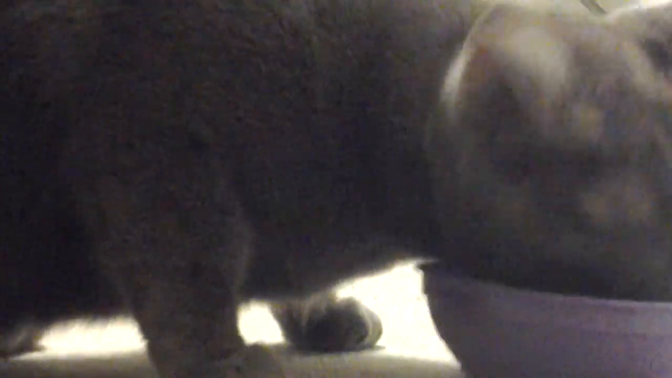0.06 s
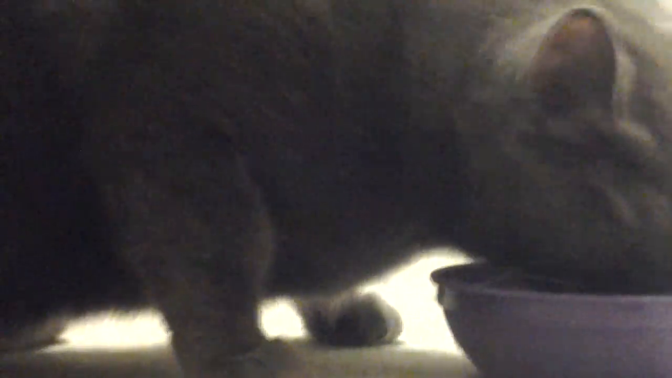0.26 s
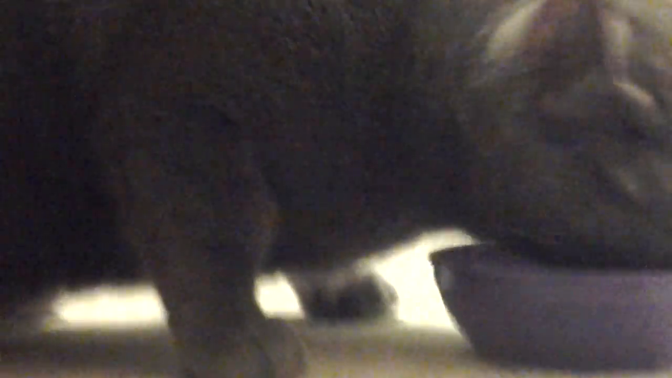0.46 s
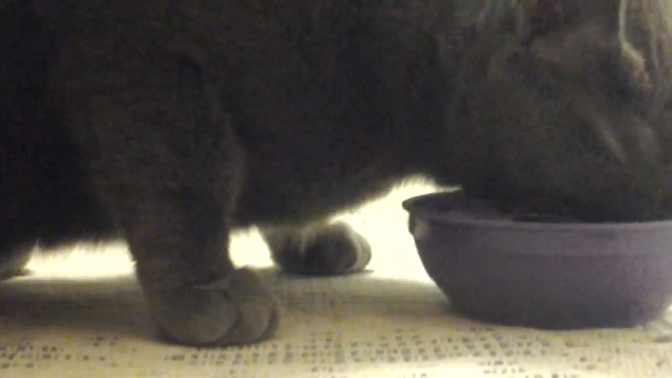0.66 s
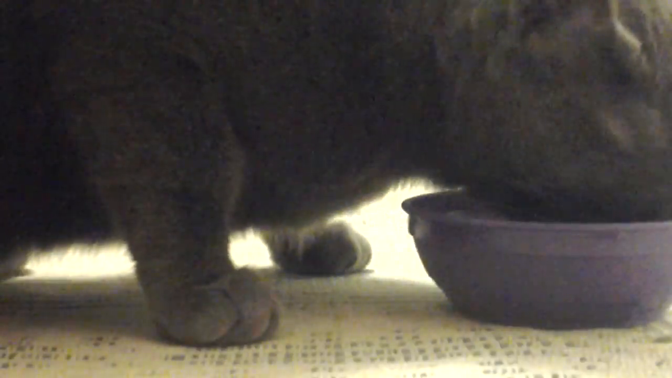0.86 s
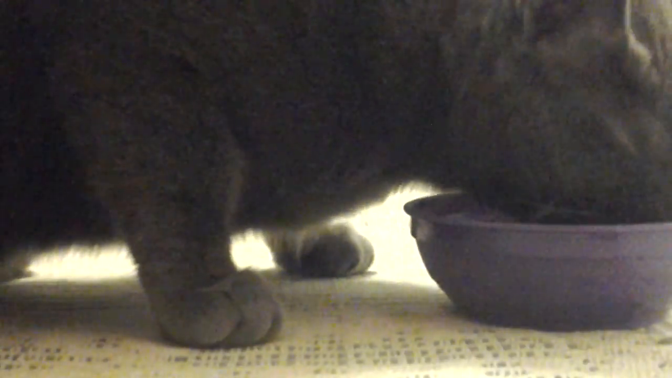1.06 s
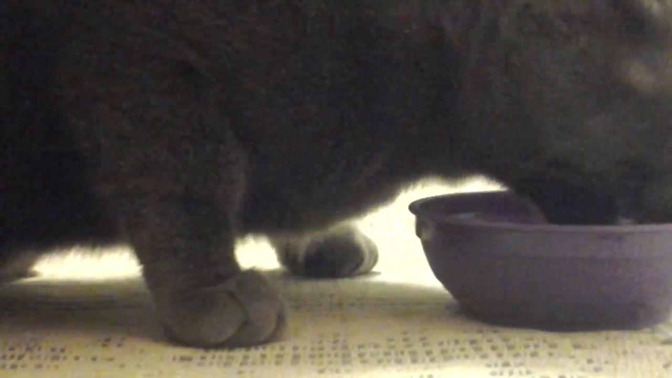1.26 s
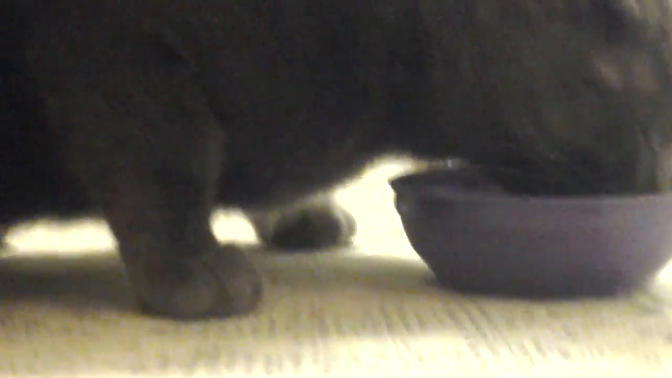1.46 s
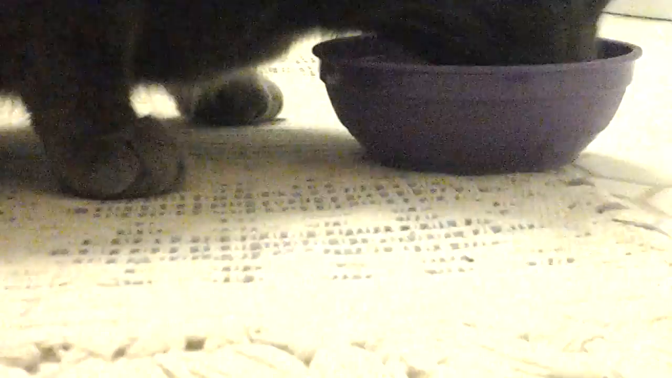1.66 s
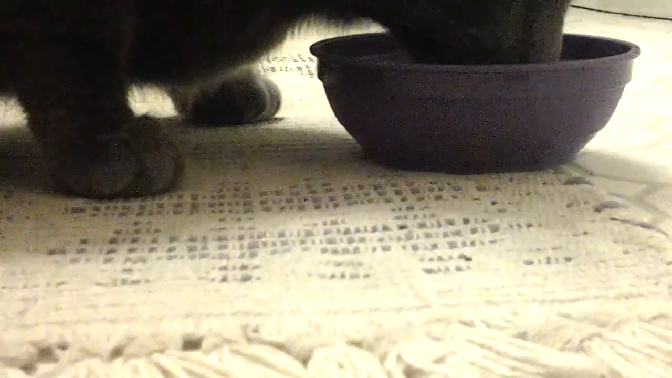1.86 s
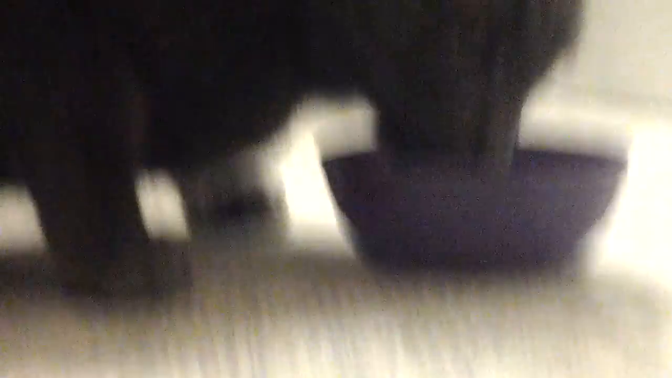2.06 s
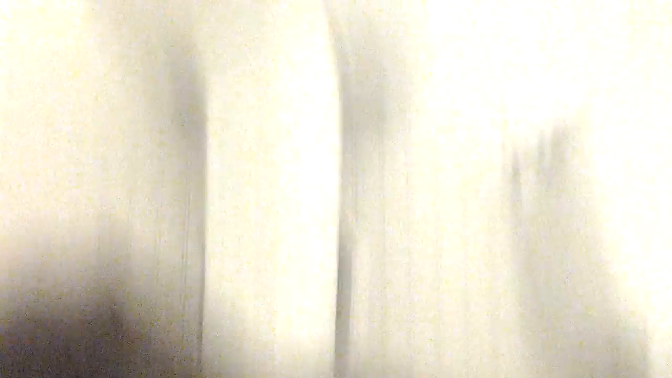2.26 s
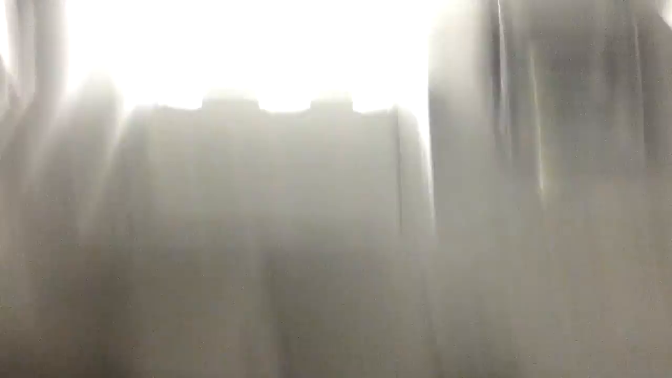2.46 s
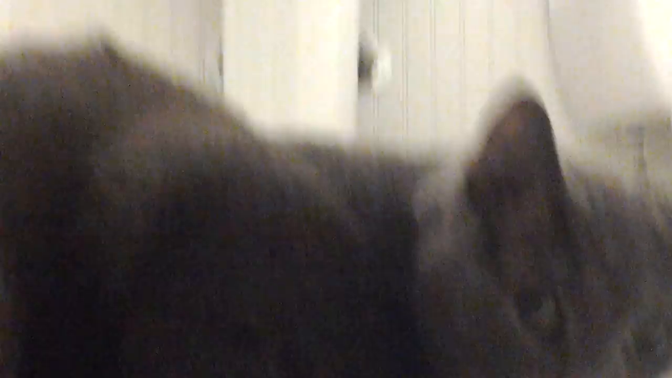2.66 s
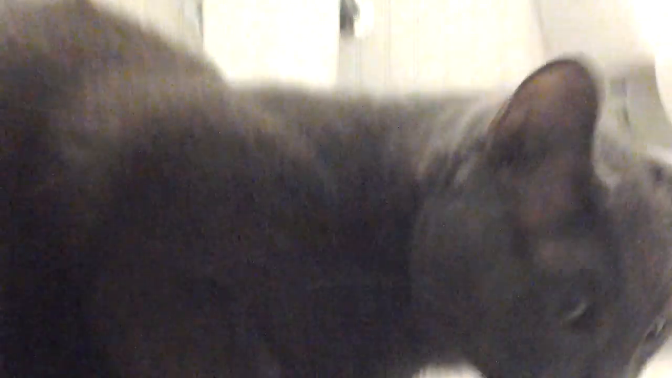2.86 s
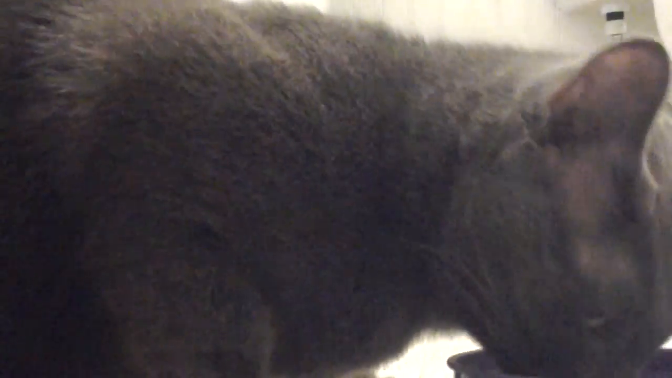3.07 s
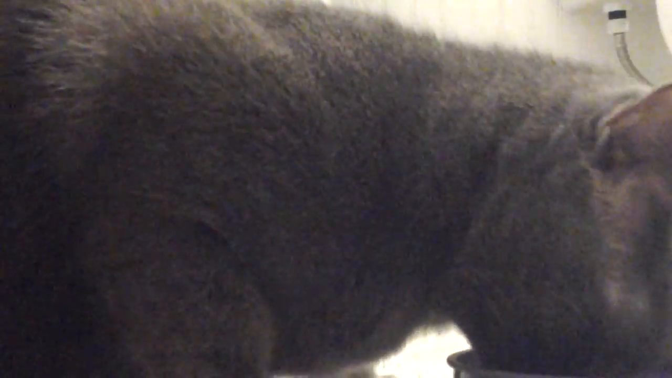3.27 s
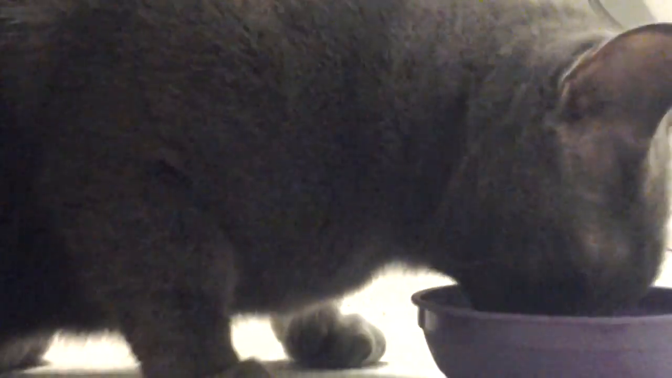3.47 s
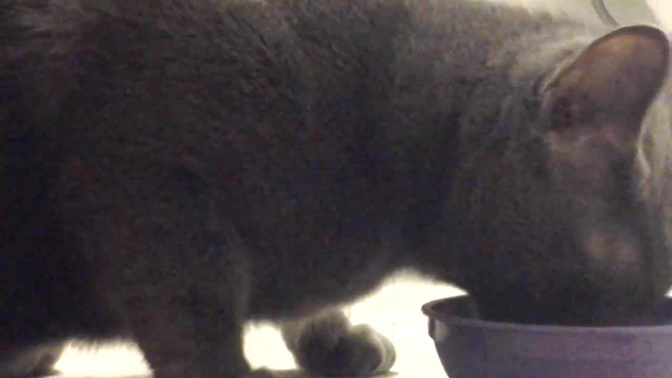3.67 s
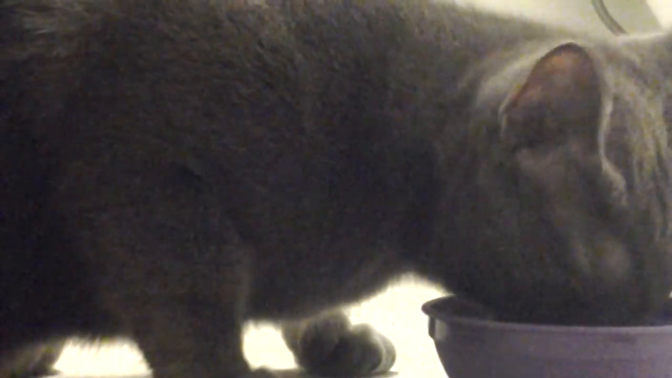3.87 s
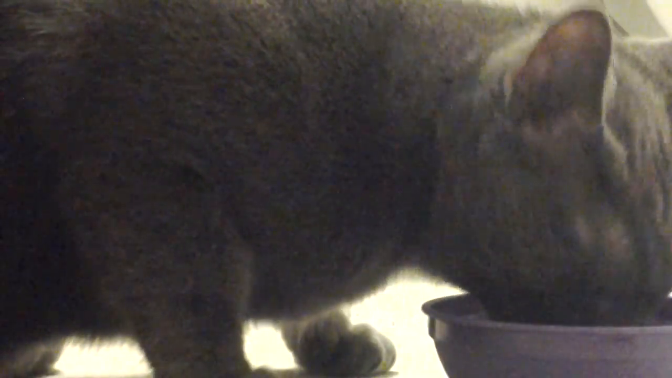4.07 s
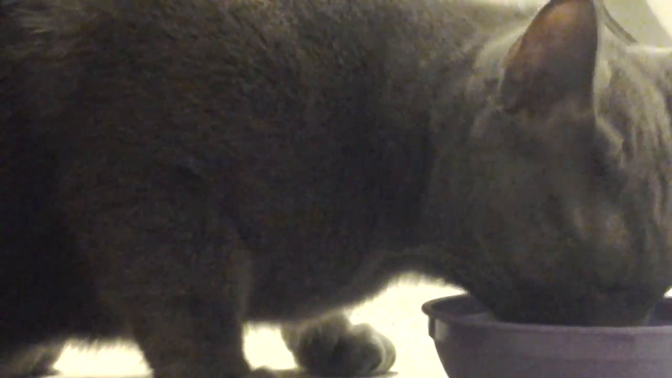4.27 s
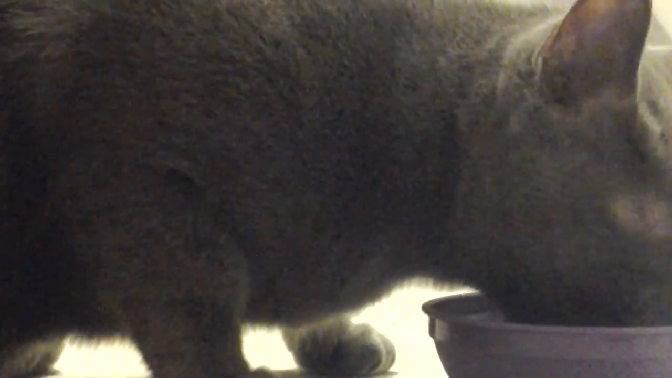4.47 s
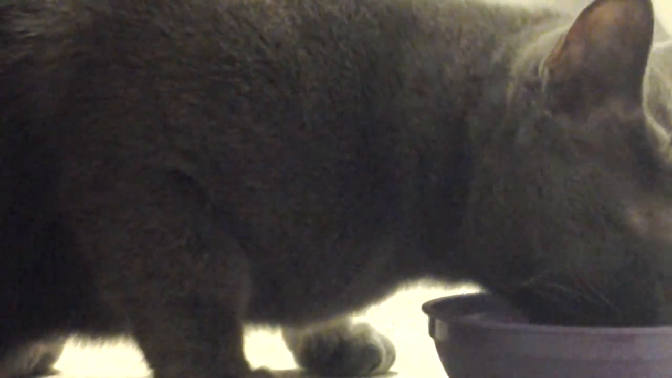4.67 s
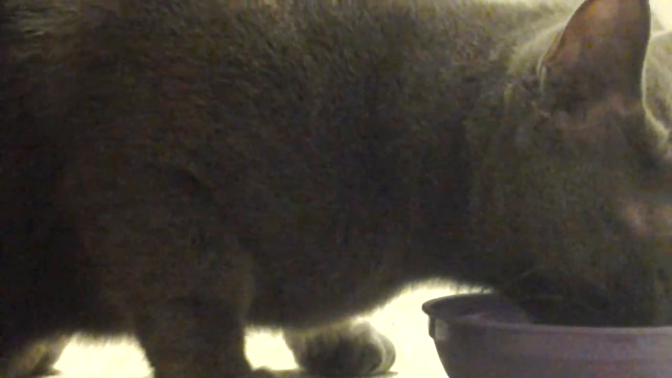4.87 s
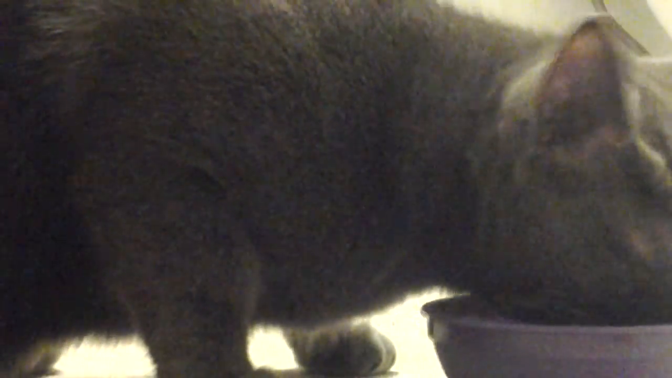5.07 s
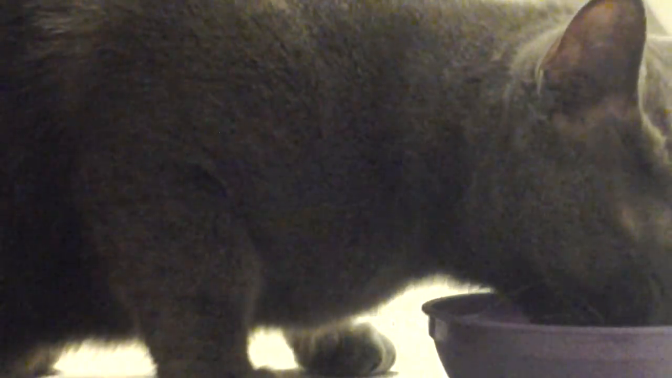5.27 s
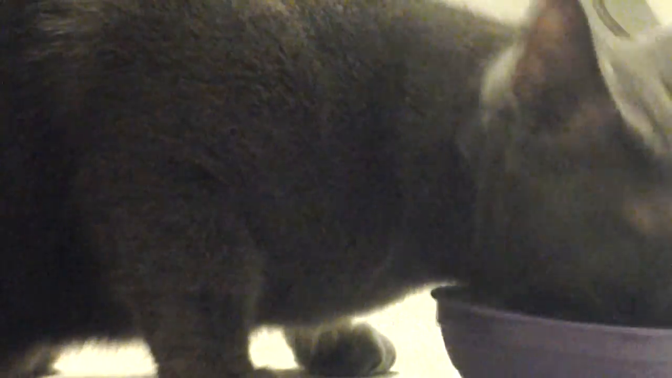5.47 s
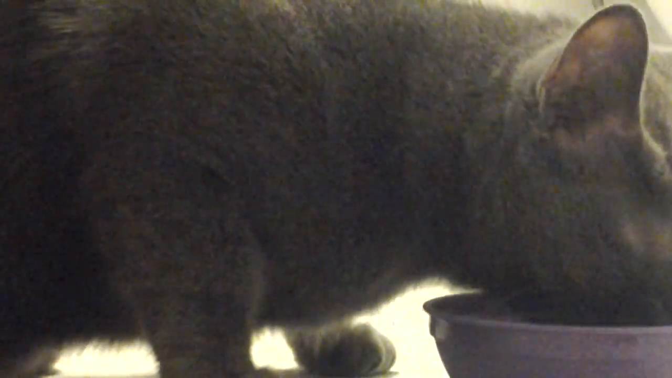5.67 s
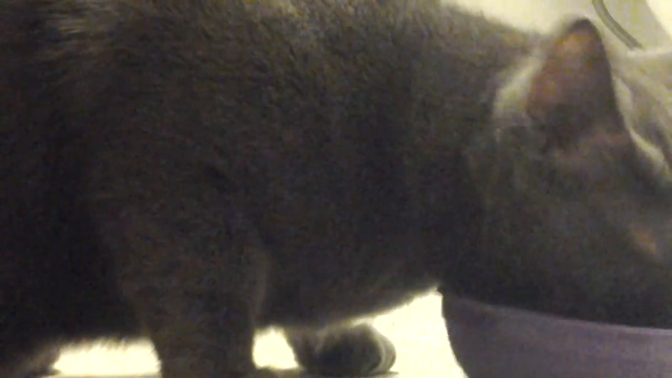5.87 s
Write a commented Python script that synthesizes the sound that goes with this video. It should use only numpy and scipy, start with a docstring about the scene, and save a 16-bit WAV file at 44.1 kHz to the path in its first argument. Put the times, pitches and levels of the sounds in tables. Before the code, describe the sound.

Close, thin-sounding capture of a cat eating dry food. Early crunches mix with dull hand knocks and a dragging mat scrape; midway, hollow finger rubbing leads to hard clipped thumps that ring in the lively room. Then crisp, uneven bites dominate, fading to scattered snaps with a faint low tone near the end.

```python
"""A cat crunches dry food from a plastic bowl in a small, hard-walled room, close to a hand-held camera.
First second: kibble snaps and rattles, the case ticks, the hand knocks; the camera drags on the mat to 1.3 s.
From 1.6 s fingers rub the case; near 2.5 and 2.65 s hard bumps overload the microphone.
From 3.6 s dense crunching, sparser after 4.7 s; a faint tone rises near 5.6 s. Impacts are filtered
clicks with micro-slips; friction is filtered noise or random grains under movement envelopes."""
import sys
import numpy as np
from scipy import signal
from scipy.fft import rfft, irfft
from scipy.io import wavfile
from scipy.ndimage import uniform_filter1d

SR = 44100
rng = np.random.default_rng(int(sys.argv[2]) if len(sys.argv) > 2 else 0)


def file_out(sig):
    """Save sig as 16-bit WAV at sys.argv[1]."""
    # one column per channel
    cols = np.atleast_2d(sig).T
    # limit, then scale
    lim = np.clip(cols, -1, 1)
    pcm = np.round(lim * 32767).astype(np.int16)
    wavfile.write(sys.argv[1], SR, pcm)


N = 260631
TIME = np.arange(N) / SR
BINS = np.fft.rfftfreq(2048, 1 / SR)  # filter grid [Hz]


def amp(db):
    """Decibels to gain."""
    return 10 ** (np.asarray(db) / 20)


def unit(x):
    """Scales to rms 1."""
    return x / np.sqrt(np.mean(x ** 2) + 1e-20)


def read(points, hz):
    """Reads a spectrum on a log-frequency axis."""
    point_hz, value = np.transpose(points)
    return np.interp(np.log(hz + 1), np.log(point_hz + 1), value)


def add(mix, start_s, sound):
    """Mixes a sound in at start_s."""
    part = mix[max(round(start_s * SR), 0):][:len(sound)]
    part += sound[:len(part)]


def colour(x, gain_db):
    """Minimum-phase filter with gain_db on BINS: it rings only after a click."""
    cepstrum = irfft(np.log(amp(np.maximum(gain_db, -100))))
    half = len(cepstrum) // 2
    # fold to the causal side
    cepstrum[1:half] *= 2
    cepstrum[half + 1:] = 0
    impulse_response = irfft(np.exp(rfft(cepstrum)))
    return signal.oaconvolve(x, impulse_response)[:len(x)]


def roll_off(corner_hz, order):
    """Low-pass slope in dB: a softer contact has a lower corner."""
    return -10 * np.log10(1 + (BINS / corner_hz) ** (2 * order))


def thud(hz, damping, crack_hz):
    """Spectrum in dB of one damped resonance of a plastic shell, softened above crack_hz."""
    ratio = (BINS + 1) / hz
    resonance_db = -10 * np.log10(1 + ((ratio - 1 / ratio) / damping) ** 2)
    return resonance_db + roll_off(crack_hz, order=1)


def disperse(x, lag_s, corner_hz=260):
    """Bending waves: the treble arrives first and the bass up to lag_s later, so a blow sweeps downward."""
    hz = np.fft.rfftfreq(len(x), 1 / SR)
    phase = -2 * np.pi * lag_s * corner_hz * np.log1p(hz / corner_hz)
    return irfft(rfft(x) * np.exp(1j * phase), len(x))


def blow(level_db, spectrum_db, rattle=0, decay_s=1, lag_s=0):
    """One impact and a swell of micro-slips, coloured by what is struck; level_db is its loudest millisecond."""
    t = TIME[:len(BINS) * 2]
    slips = rng.standard_normal(len(t)) * np.sqrt(t) * np.exp(-t / decay_s)
    force = (t == 0) + rattle * slips / np.linalg.norm(slips)
    sound = disperse(colour(force, spectrum_db), lag_s)
    loudest_power = uniform_filter1d(sound ** 2, size=44, mode="constant").max()
    return amp(level_db) * sound / np.sqrt(loudest_power)


def grains(per_s, spread_db, size=N):
    """Random tiny impacts, most small and a few large."""
    strength = amp(spread_db * np.minimum(rng.exponential(1, size), 3.5))
    present = rng.random(size) < per_s / SR
    return strength * rng.choice([-1, 1], size) * present


def lumps(length_s, depth_db):
    """Uneven gain of rms 1 that swells and sinks at random, each lump about length_s long."""
    size = round(length_s * SR)
    smooth = uniform_filter1d(uniform_filter1d(rng.standard_normal(N), size), size)
    return unit(amp(depth_db * unit(smooth)))


def stroke(peak_s, rise_s, fall_s):
    """Gain of one movement: it grows exponentially to 1 at peak_s, then dies away."""
    return np.exp(-np.maximum((peak_s - TIME) / rise_s, (TIME - peak_s) / fall_s).clip(0, 50))


# room decay: (frequency [Hz], t60 [s])
ROOM_DECAY = [(200, 1), (600, 0.57), (1600, 0.42), (4500, 0.5), (8000, 0.32), (14000, 0.12)]


def room(x):
    """Dense wall reflections, each band dying at its own speed."""
    hz, t, bands = signal.stft(rng.standard_normal(SR), SR, nperseg=256)
    bands = bands * amp(-60 * t / read(ROOM_DECAY, hz)[:, None])
    fade_in = np.clip((TIME[:SR] - .002) / 0.0012, 0, 1)
    tail = signal.istft(bands, SR)[1][:SR] * fade_in
    tail /= np.sqrt(np.mean(abs(rfft(tail)[1000:4000]) ** 2))  # unit mean power gain, 1-4 kHz
    return signal.fftconvolve(x, tail)[:N]


def shifting_room(x, turns_per_s=2.9, count=3):
    """The room as heard from a moving head: a few different tails take turns."""
    shares = [np.maximum(np.cos(2 * np.pi * (turns_per_s * TIME - k / count)), 0) for k in range(count)]
    total = np.linalg.norm(shares, axis=0)
    return sum(room(x * share / total) for share in shares)


# room noise spectrum: (frequency [Hz], relative gain [dB])
NOISE_SPECTRUM = [(110, 1), (280, 3), (900, -2), (1450, -8), (4000, -10), (6500, -12.5), (14500, -16.5)]
# faint low tone: (time [s], level [dB])
TONE_LEVEL = [(5.56, -66), (5.59, -50.5), (5.91, -53)]
NOISE_DB, TONE_HZ = -56.5, 592


def background(width_hz=48):
    """Quiet coloured noise with drifting level; narrow-band noise makes a fluttering faint tone."""
    drift, flutter = lumps(length_s=.08, depth_db=1), lumps(length_s=.02, depth_db=3)
    noise = drift * unit(colour(rng.standard_normal(N), read(NOISE_SPECTRUM, BINS)))
    hz = np.fft.rfftfreq(N, 1 / SR)
    resonance = 1 / (1 + ((hz - TONE_HZ) / width_hz) ** 2)
    tone = flutter * irfft(rfft(rng.standard_normal(N)) * resonance, N)
    tone_db = np.interp(TIME, *np.transpose(TONE_LEVEL))
    return amp(NOISE_DB) * noise + amp(tone_db) * unit(tone)


# woven mat spectrum: (frequency [Hz], relative gain [dB])
MAT_SPECTRUM = [(60, -2), (300, 8), (600, 7), (1200, 1), (3600, -15.5), (8000, -35.5)]
# shoves of the camera over the mat: (time of top speed [s], level [dB], speed-up [s])
MAT_SHOVES = [(0.539, -34.5, 0.029), (0.985, -43, 0.0074), (1.039, -40.5, 0.03), (1.229, -24.5, 0.075)]
MAT_STOP_S = 0.023


def dragging(drag_db=0, room_db=-13):
    """The weave of the mat catches and lets go, in dense clumps of strands."""
    catches = grains(per_s=1800, spread_db=2.5) * lumps(length_s=.004, depth_db=3)
    strands = disperse(colour(catches, read(MAT_SPECTRUM, BINS)), lag_s=0.00388)
    speed = sum(amp(db) * stroke(s, rise_s, MAT_STOP_S) for s, db, rise_s in MAT_SHOVES)
    dry = amp(drag_db) * speed * unit(strands)
    return dry + amp(room_db) * room(dry)


# hollow rumble of the rubbed case: (frequency [Hz], relative gain [dB])
RUMBLE_SPECTRUM = [(60, -12.5), (200, -9), (310, -8.5), (410, 2.5), (580, -14), (900, -12), (2300, -23),
                   (5000, -29), (9000, -37.5)]
# fine hiss of skin: (frequency [Hz], relative gain [dB])
HISS_SPECTRUM = [(500, -3), (5000, 14), (10500, 3), (13500, 8.5), (15000, 0.5)]
# fingers on the case: (time of top speed [s], speed-up [s], slow-down [s], rumble level [dB], hiss level [dB])
FINGER_SLIDES = [(1.603, 0.054, 0.061, -33, -48.5), (2.17, 0.065, 0.28, -49, -52.5),
                 (2.278, 0.016, 0.039, -29, -38), (2.425, 0.03, 0.025, -35, -40),
                 (2.506, 0.012, 0.019, -15, -41.5), (2.607, 0.022, 0.036, -21, -38.5),
                 (3.425, 0.03, 0.033, -40, -50)]


def rubbing(body_db=0, hiss_db=0):
    """Skin sticks and slips on the case in jerks: each slide makes a hollow rumble and a fine hiss."""
    jerks = lumps(length_s=.004, depth_db=4.5)
    slips, grit = grains(per_s=2500, spread_db=3), grains(per_s=6000, spread_db=4.5)
    body = amp(body_db) * unit(colour(jerks * slips, read(RUMBLE_SPECTRUM, BINS)))
    hiss = amp(hiss_db) * unit(colour(jerks * grit, read(HISS_SPECTRUM, BINS)))
    return sum(stroke(s, rise_s, fall_s) * (amp(rumble_db) * body + amp(slide_hiss_db) * hiss)
               for s, rise_s, fall_s, rumble_db, slide_hiss_db in FINGER_SLIDES)


# dull knocks of the hand on the camera: (time [s], relative level [dB], pitch [Hz])
HAND_KNOCKS = [(0.3032, -29.5, 604), (0.3136, -25.5, 337), (0.3495, -32, 393), (0.3924, -18, 580),
               (0.5415, -26, 353), (0.9835, -26, 302), (1.111, -30.5, 470), (1.1264, -20.5, 385),
               (1.2001, -11, 305), (1.2438, -23, 600), (1.4714, -25, 320), (1.486, -24.5, 494),
               (1.5156, -25.5, 428), (2.3751, -17.5, 308), (2.448, -14.5, 370), (2.608, -20.5, 401),
               (3.0048, -19.5, 760), (3.1356, -29, 215), (3.242, -36.5, 710), (5.8189, -31, 493),
               (5.831, -31.5, 1060)]


def knocks(knock_db=2, room_db=-21, crack_ratio=5, skin_ratio=7):
    """Soft blows of the hand: a damped low push that sweeps downward."""
    dry = np.zeros(N)
    for s, db, hz in HAND_KNOCKS:
        shape_db = thud(hz, damping=0.59, crack_hz=crack_ratio * hz) + roll_off(skin_ratio * hz, order=3)
        add(dry, s, blow(db + knock_db, shape_db, rattle=0.54, decay_s=0.007, lag_s=.004))
    return dry + amp(room_db) * room(dry)


# case plastic spectrum: (frequency [Hz], relative gain [dB])
CASE_SPECTRUM = [(150, -10), (800, 7), (1700, 2), (3000, -3.5), (5200, 1.5), (7500, -7.5), (10000, -11),
                 (13300, 3.5), (15000, 3.5)]
# ticks and scrapes of the case: (time [s], relative level [dB], brightness [Hz], slip length [s])
CASE_SLIPS = [(0.2841, -13.5, 8500, 0.00075), (0.303, -7, 9300, 0.00041), (0.311, -22.5, 1980, 0.0017),
              (0.3925, -28.5, 4200, 0.00099), (0.4583, -32.5, 6300, 0.00026), (1.426, -33.5, 2880, .0004),
              (1.441, -30.5, 3900, 0.00027), (1.4524, -28.5, 3420, 0.00014), (1.488, -38, 4500, .0004),
              (1.512, -39.5, 4500, 0.00044), (2.265, -24, 2113, 0.0017), (2.2945, -15, 8420, 0.00052),
              (2.2986, -15, 9120, .0005), (2.3265, -20.5, 4150, 0.0013), (2.341, -29.5, 3940, 0.0036),
              (2.4374, -5, 8960, 0.00026), (2.4402, -1.5, 8600, 0.00036), (2.446, -8.5, 5000, 0.00021),
              (2.455, -13, 7540, .0002), (2.5045, -6.5, 4483, .0009), (2.6505, -10, 9100, 0.00055),
              (2.67, -21, 4096, .0015), (2.813, -29, 8460, 0.00045), (3.0032, -8.5, 6500, .0007),
              (3.006, -12.5, 6700, 0.00033)]
CASE_DAMPING = .8
CLEAN_SLIP_S = 0.00055  # much longer slips turn gritty


def case_ticks(tick_db=1.5, room_db=-24, broad_db=-19):
    """Case parts slip in a clean tick or a longer gritty scrape, beside the microphone and so almost dry."""
    dry = np.zeros(N)
    for s, db, hz, slip_s in CASE_SLIPS:
        ring = amp(thud(hz, CASE_DAMPING, crack_hz=2 * hz))
        ring_db = 20 * np.log10(ring + amp(broad_db))
        shape_db = read(CASE_SPECTRUM, BINS) + ring_db + roll_off(2 * hz, order=2)
        grit = np.sqrt(slip_s / CLEAN_SLIP_S)
        add(dry, s, blow(db + tick_db, shape_db, rattle=grit, decay_s=slip_s))
    return dry + amp(room_db) * room(dry)


# hard bumps: (time [s], level [dB], pitch [Hz], rattle relative to impact [ratio], room send re level [dB])
CAMERA_BUMPS = [(2.5038, 1, 600, 0.62, -32), (2.5354, -4.5, 2100, 2.1, -39.5),
                (2.5378, 2.5, 1040, 1.3, -33.5), (2.5431, 1, 250, .05, -34.5), (2.549, 2, 380, 0.3, -31.5),
                (2.5558, -11.5, 334, 0.078, -38), (2.652, 2, 2200, 0.96, -13.5),
                (2.6525, 4, 750, 0.67, -16), (2.6703, -9, 830, 2.9, -17.5)]
HUM_T60_S = .42


def bumps(crack_ratio=2.1, lowest_hz=160, hum_hz=392, hum_db=-45):
    """Hard blows on the camera; the last ones ring out most in the room and in one low humming resonance."""
    dry, sent = np.zeros(N), np.zeros(N)
    low_cut_db = -10 * np.log10(1 + (lowest_hz / (BINS + 1)) ** 4)
    for s, db, hz, rattle, room_db in CAMERA_BUMPS:
        shape_db = thud(hz, damping=0.89, crack_hz=crack_ratio * hz) + low_cut_db
        add(dry, s, blow(db, shape_db, rattle=rattle, decay_s=0.0012, lag_s=.004))
        add(sent, s, blow(db + room_db, shape_db))  # the rattle stays inside the case
    t = TIME[:SR]
    hum = amp(hum_db - 60 * t / HUM_T60_S) * np.sin(2 * np.pi * hum_hz * t)
    return dry + room(sent) + signal.fftconvolve(sent, hum)[:N]


# food or muzzle rubbing the bowl wall: (time of height [s], level [dB], pitch [Hz], swell [s])
WALL_RUBS = [(1.298, -38, 1400, .005), (1.628, -31, 1500, 0.0049), (3.423, -32, 260, 0.015),
             (3.54, -52.5, 1420, 0.041), (5.529, -38.5, 1580, .002)]


def bowl_rubs(damping=0.16):
    """Friction noise stirs one resonance of the plastic bowl into a brief, soft squeak or groan."""
    out = np.zeros(N)
    for s, db, hz, swell_s in WALL_RUBS:
        shape_db = 2 * thud(hz, 2 * damping, 2 * hz)
        squeak = unit(colour(rng.standard_normal(N), shape_db))
        out += amp(db) * stroke(s, swell_s, swell_s) * squeak
    return out


# kibble spectrum: (frequency [Hz], relative gain [dB])
KIBBLE_SPECTRUM = [(250, -40), (900, -16.5), (1300, -3), (1650, -0.5), (2300, -5.5), (3200, -4.5),
                   (4500, -2.5), (6200, -8), (14000, -23)]
# kibble snapping in the teeth or dropping in the bowl: (time [s], level [dB], ring [Hz])
KIBBLE_SNAPS = [(0.1119, -23, 4900), (0.1825, -27, 4130), (0.1967, -25.5, 2770), (0.566, -19, 2470),
                (0.6568, -30, 4270), (0.76, -33.5, 1910), (0.8192, -28, 2030), (0.951, -30.5, 1980),
                (1.278, -30, 1850), (1.356, -33, 1580), (1.373, -33, 1530), (1.8833, -40, 4050),
                (1.949, -35.5, 3800), (1.9851, -29, 4470), (2.061, -34, 1360), (3.6111, -38.5, 1870),
                (3.7583, -19, 2060), (3.83, -26, 2150), (3.878, -24.5, 2280), (3.954, -16, 4950),
                (4.0477, -19.5, 3990), (4.1686, -26, 2050), (4.253, -19.5, 2170), (4.3276, -23, 2130),
                (4.4317, -25, 2150), (4.45, -19.5, 2000), (4.6384, -27, 1820), (4.701, -36, 2110),
                (5.038, -29, 2500), (5.0424, -26, 2620), (5.1441, -31.5, 2740), (5.456, -35, 3050),
                (5.592, -27, 2550), (5.639, -37.5, 3000), (5.821, -27.5, 1290), (5.8892, -28, 4700)]
# jaw strokes, grinding harder until the food gives way: (time of height [s], relative level [dB], build-up [s])
JAW_STROKES = [(0.01, -52, 0.018), (0.148, -34.5, 0.0037), (0.22, -33.5, 0.091), (0.353, -30.5, 0.046),
               (0.532, -30, 0.0076), (0.955, -40.5, 0.0047), (3.748, -30.5, 0.039), (3.971, -33.5, 0.036),
               (4.059, -33, 0.021), (4.622, -34.5, 0.014), (5.059, -32.5, 0.017), (5.599, -40.5, 0.0023),
               (5.705, -40.5, 0.0046), (5.89, -39.5, 0.041)]
JAW_RELEASE_S = 0.018
# first echoes from bowl, floor and walls: (delay [s], gain [ratio])
FIRST_ECHOES = [(0.0135, 0.1), (0.0181, 0.053)]


def eating(snap_db=0, grind_db=-5, splinter_db=-15, load_s=0.0037, splinter_s=0.014, loose_db=-16,
           room_db=-2.5, corner_ratio=1.483, ring_db=5, ring_octaves=0.38):
    """Brittle snaps, each with its own ring and splinters, amid crumbling; the room throws all back."""
    snaps, sent, crackle = np.zeros((3, N))
    kibble_db = read(KIBBLE_SPECTRUM, BINS)
    strain = stroke(.01, load_s, splinter_s)[:4096]
    for s, db, hz in KIBBLE_SNAPS:
        peak_db = ring_db * np.exp(-(np.log2((BINS + 1) / hz) / ring_octaves) ** 2)
        shape_db = kibble_db + roll_off(corner_ratio * hz, order=4)
        add(snaps, s, blow(db + snap_db, shape_db + peak_db, rattle=1.0, decay_s=0.00028))
        add(sent, s, blow(db + snap_db, shape_db))  # the room hears the plain crack
        splinters = unit(colour(grains(per_s=450, spread_db=3.5, size=len(strain)), shape_db))
        add(crackle, s - strain.argmax() / SR, amp(db + splinter_db) * strain * splinters)

    jaw = sum(amp(db) * stroke(s, build_s, JAW_RELEASE_S) for s, db, build_s in JAW_STROKES)
    fractures = grains(per_s=480, spread_db=2.8)
    crumbs = unit(colour(fractures, kibble_db + roll_off(4320, order=3)))
    nudges = grains(per_s=45, spread_db=4)
    loose = unit(colour(nudges, kibble_db + roll_off(2600, order=3)))
    feeding = uniform_filter1d(jaw, size=SR // 2)  # around each bite the muzzle nudges loose pieces
    crackle += amp(grind_db) * jaw * crumbs + amp(loose_db) * feeding * loose

    dry = snaps + crackle
    out = dry + amp(room_db) * shifting_room(sent + crackle)
    for delay_s, gain in FIRST_ECHOES:
        add(out, delay_s, gain * dry)
    return out


def scene():
    """One microphone feeds both channels."""
    handling = dragging() + rubbing() + knocks() + case_ticks() + bumps()
    mono = background() + handling + bowl_rubs() + eating()
    return np.array([mono, mono])


EDGE_HZ = 14800


def record(dry, low_cut_hz=175):
    """The small microphone loses the bass, its input clips at full scale; then the band limit."""
    thin = signal.sosfilt(signal.butter(2, low_cut_hz, "high", fs=SR, output="sos"), dry)
    clipped = np.clip(thin, -1, 1)
    band_limit = signal.firwin(255, EDGE_HZ, window=("kaiser", 8), fs=SR)
    return signal.oaconvolve(clipped, band_limit[None], "same")


dry = scene()
out = record(dry)
file_out(out)
```